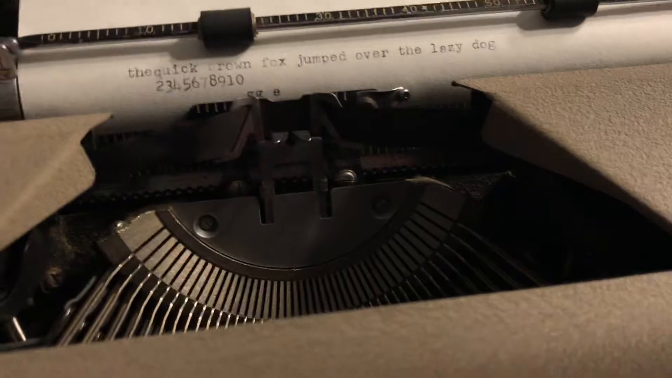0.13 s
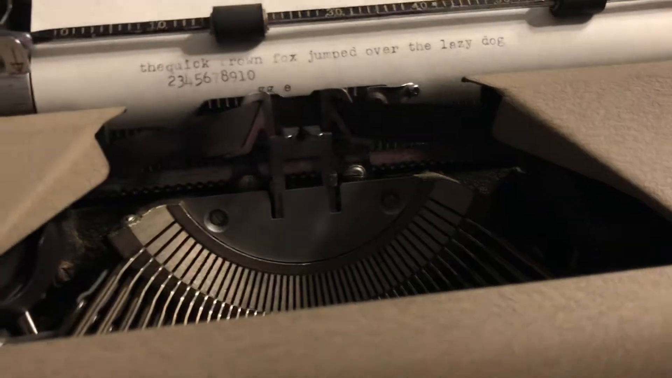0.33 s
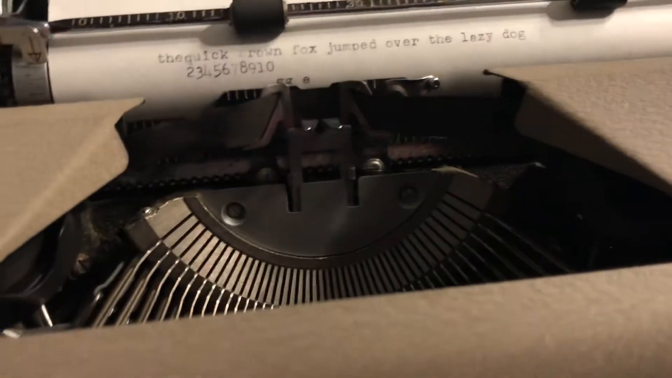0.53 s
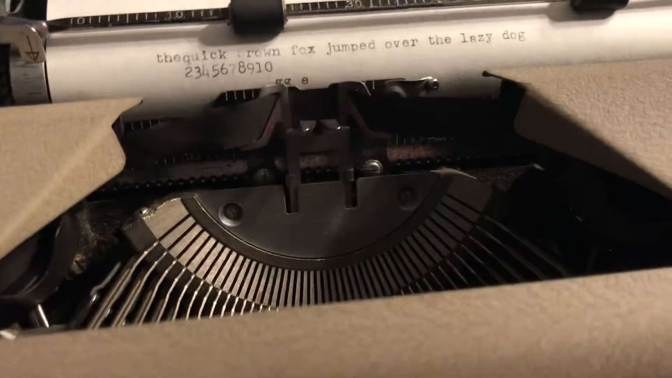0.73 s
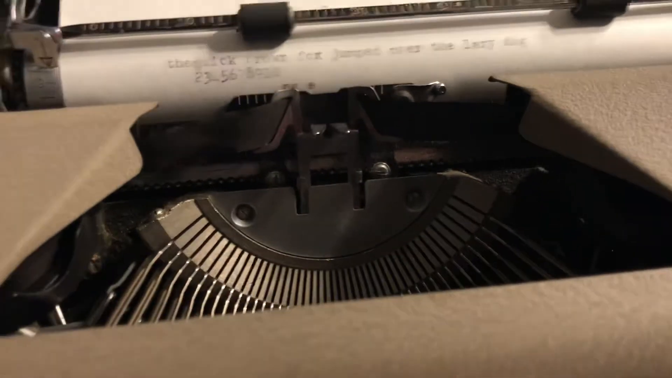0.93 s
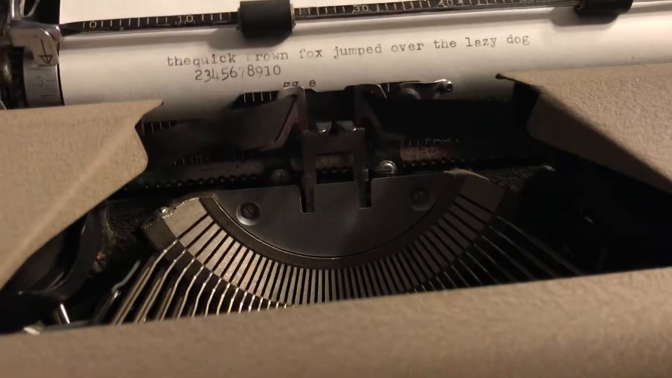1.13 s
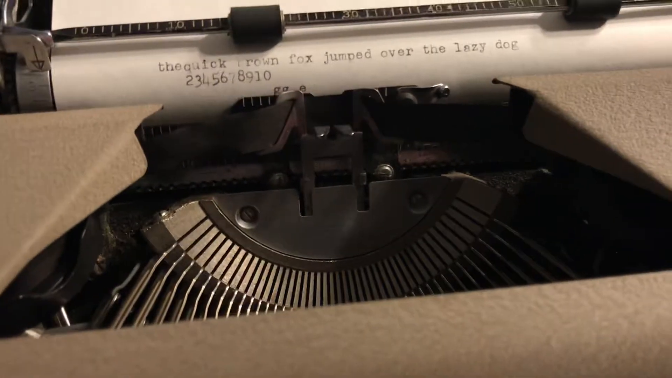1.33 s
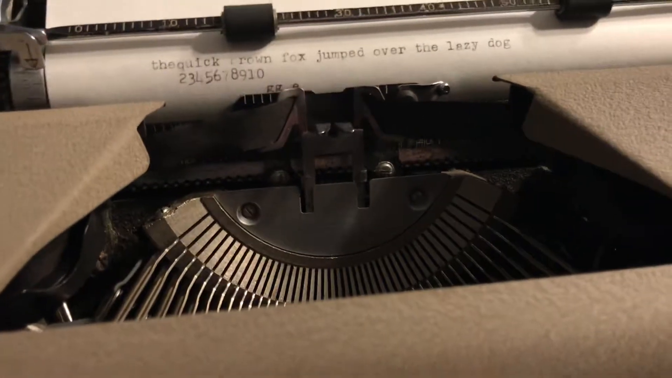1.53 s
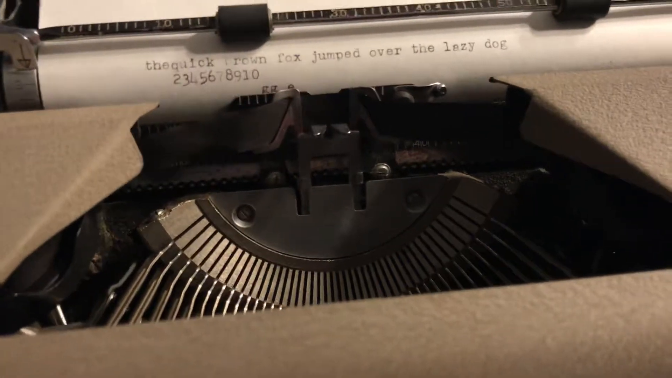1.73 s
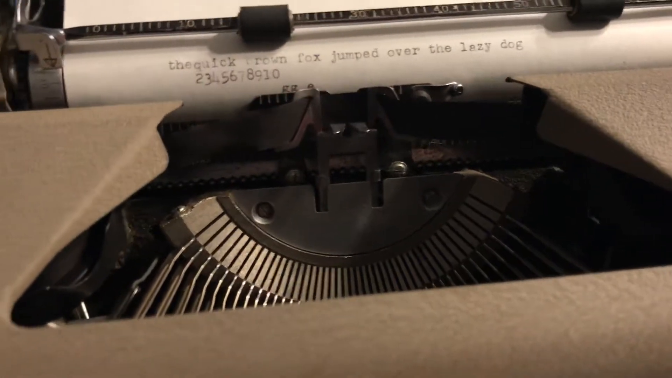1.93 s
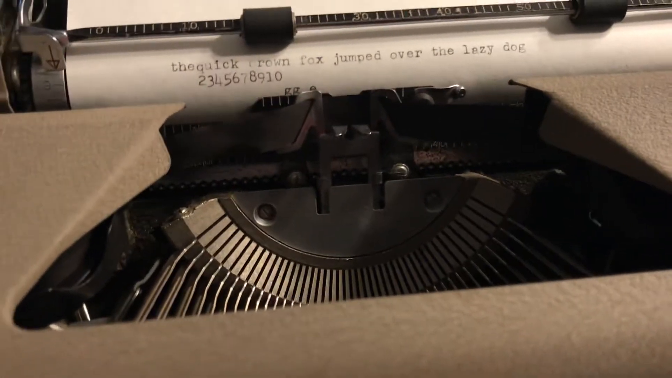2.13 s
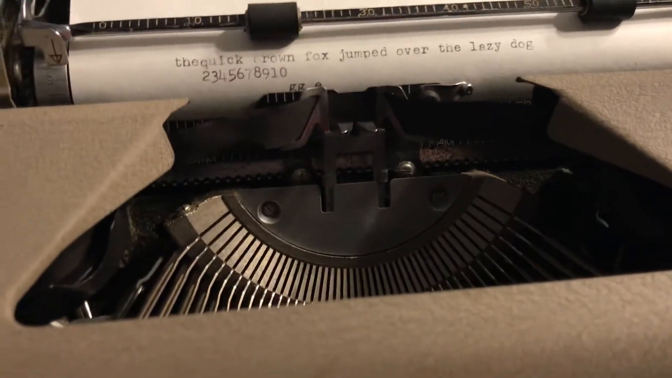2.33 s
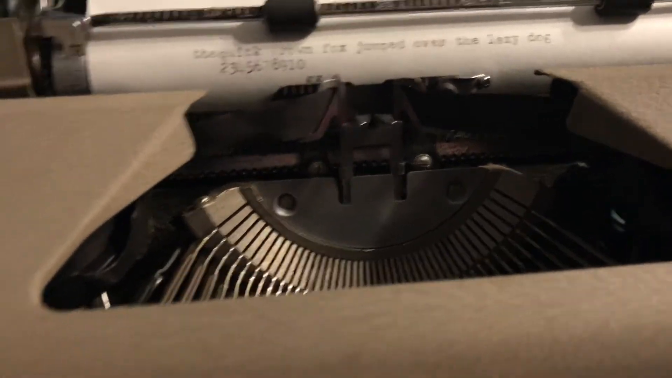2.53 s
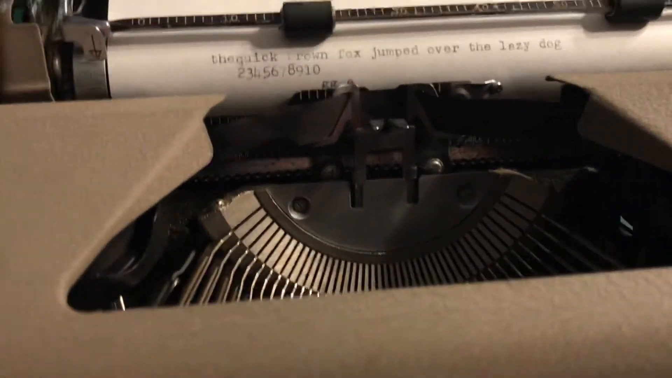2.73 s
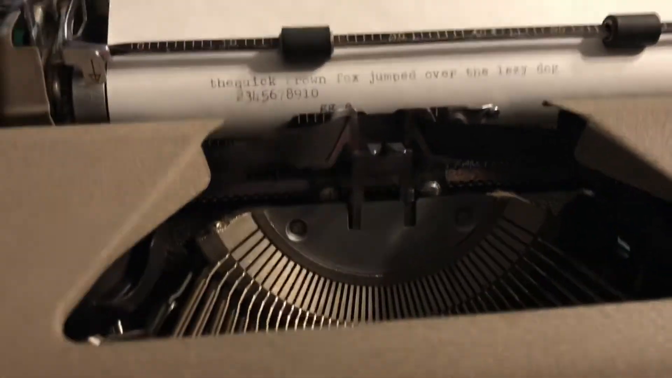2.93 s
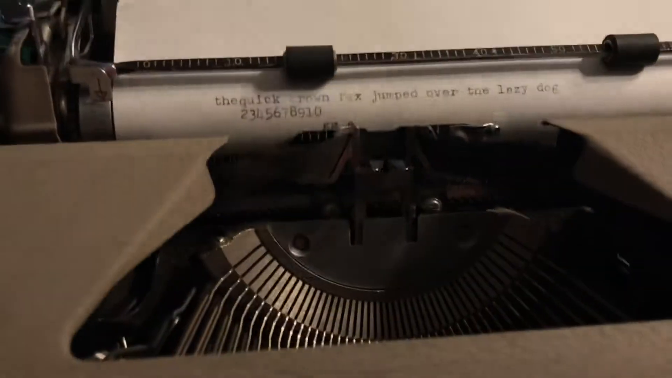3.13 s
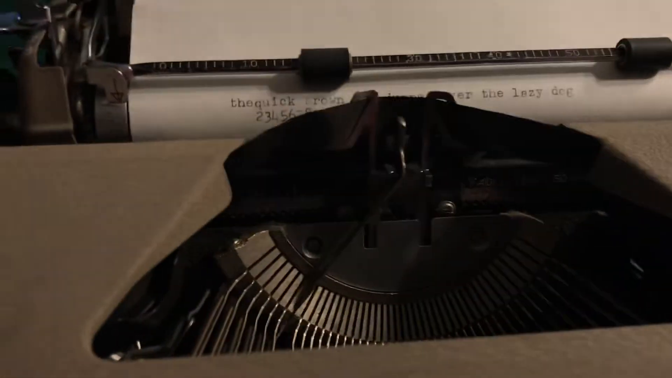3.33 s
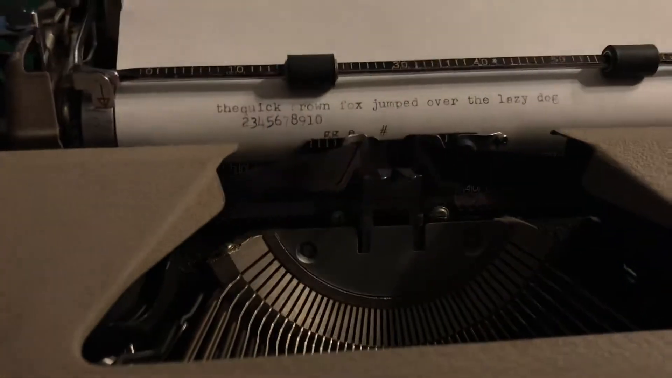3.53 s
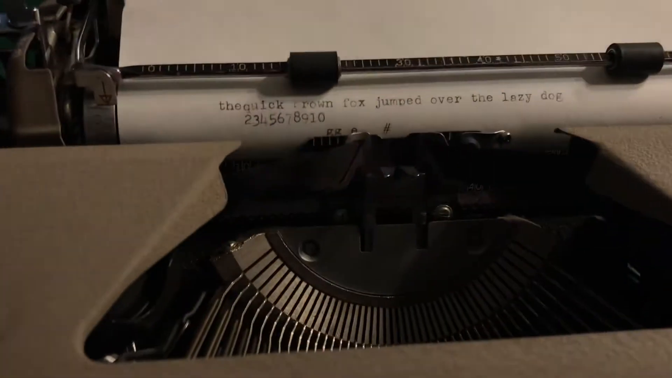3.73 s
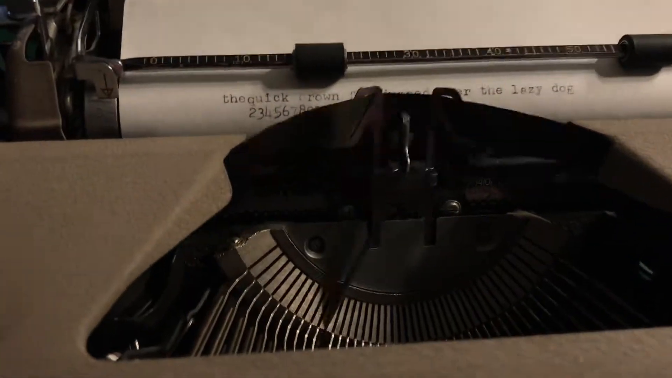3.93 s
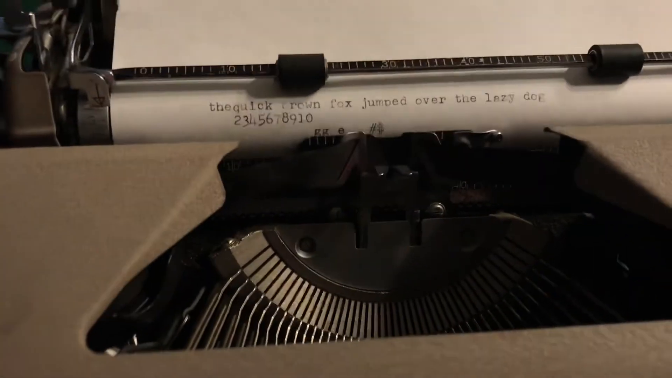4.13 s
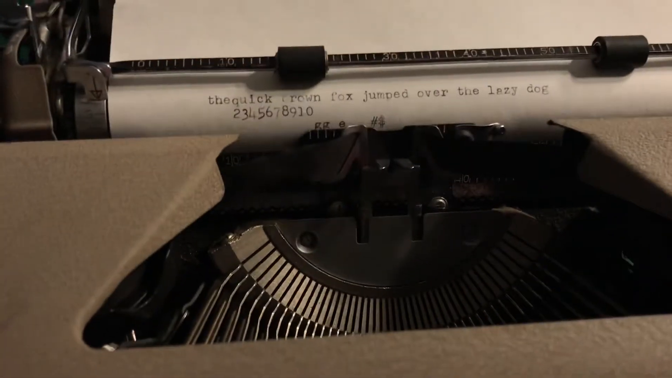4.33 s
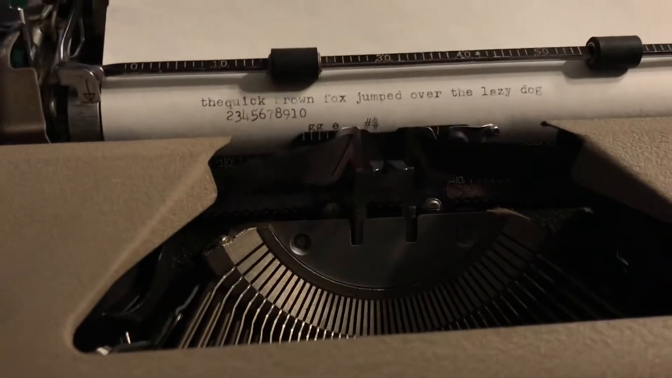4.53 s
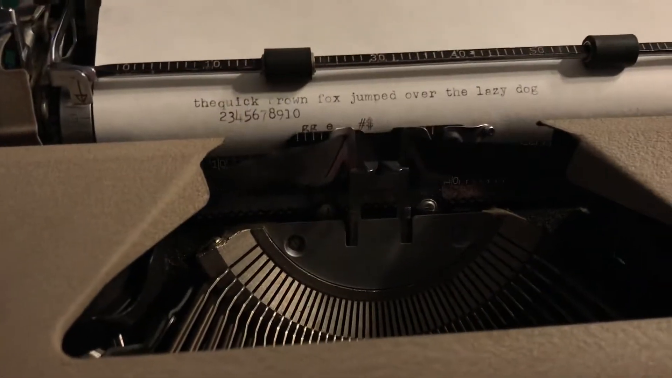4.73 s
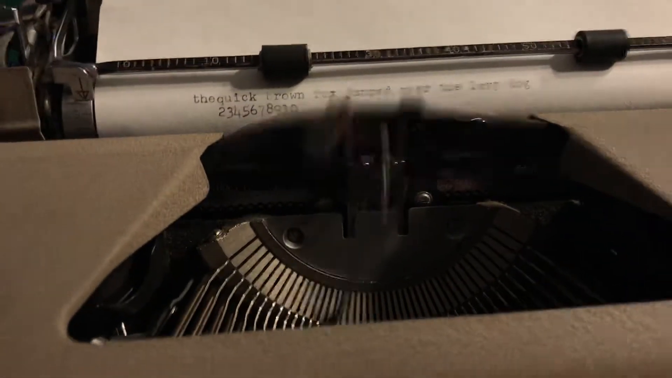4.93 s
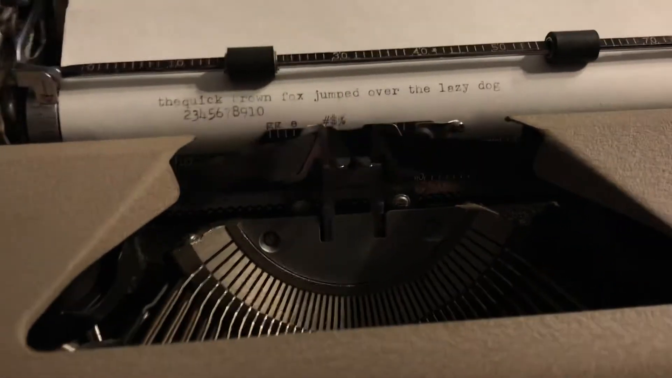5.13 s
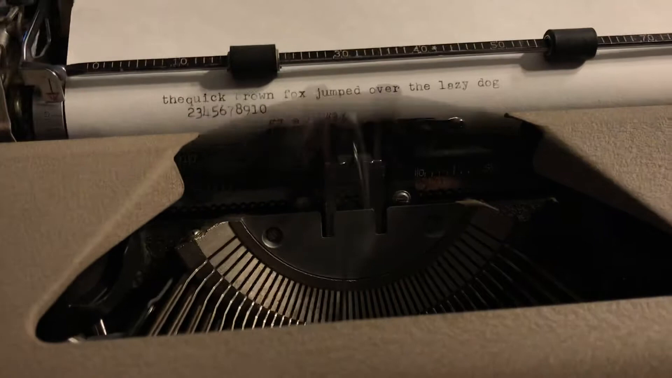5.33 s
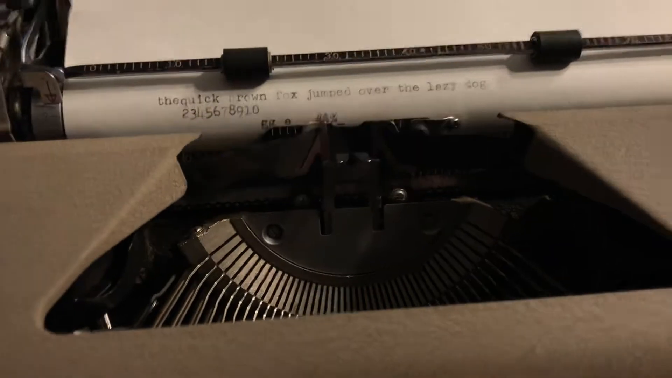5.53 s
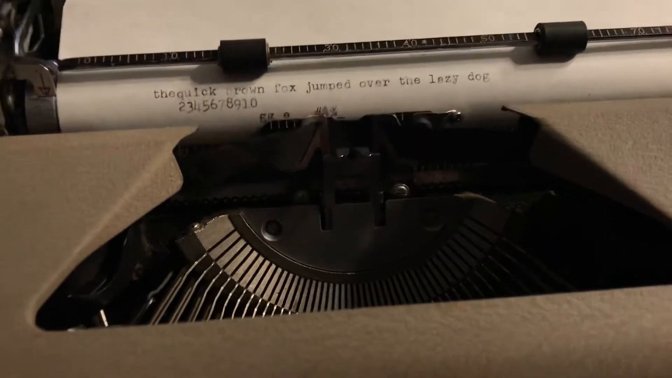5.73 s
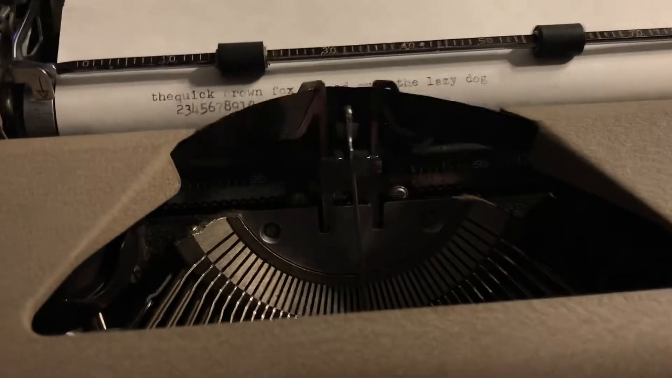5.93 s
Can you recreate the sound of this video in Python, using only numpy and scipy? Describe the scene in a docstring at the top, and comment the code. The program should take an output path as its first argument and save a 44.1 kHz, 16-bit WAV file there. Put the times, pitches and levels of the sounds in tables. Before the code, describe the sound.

A manual typewriter's space bar is tapped three times, then five keys clack slowly, one at a time, over a low hum.

```python
"""A manual typewriter on a desk in a quiet room, a small microphone close to it. Mains hum, room rumble
and hiss come first. A finger lands and the space bar is pressed three times. Then five keys are struck:
lever, typebar on the platen, escapement, and the bar falling back. Each is a cluster of steel contacts
that knock the case and thump the desk. The hiss is louder for a moment after each press and landing."""
import sys
import numpy as np
from scipy import signal
from scipy.fft import rfft, irfft, next_fast_len
from scipy.io import wavfile
from scipy.ndimage import uniform_filter1d, map_coordinates

SR = 44100
rng = np.random.default_rng(int(sys.argv[2]) if len(sys.argv) > 2 else 0)


def waveform_to_disk(signal):
    """Save audio, clipped to [-1, 1], as 16-bit WAV at the path in sys.argv[1]."""
    frames = np.transpose(np.atleast_2d(signal))
    scaled = np.clip(frames, -1, 1) * 32767
    samples = np.round(scaled).astype(np.int16)
    wavfile.write(sys.argv[1], SR, samples)


N = 268216

# Contact levels and decays are nominal: linkage() scales them for steel, case and desk.
# space bar going down: click_s, click_db, bottoming_db
SPACE_PRESSES = [(.829, -28, -26), (1.0944, -25.5, -30), (1.3609, -24.5, -30)]
# space bar let go: catch_s, catch_db, catch_rise_ms, stop_s, stop_db, stop_rise_ms, stop_jolt_db,
# land_s, land_db, land_rise_ms, land_jolt_db
SPACE_RELEASES = [(.968, -32, 8.3, .9782, -25.5, 13, -32, 1.0036, -28, 13, -25.5),
                  (1.228, -32, 7, 1.2353, -23, 2.8, -30, 1.2658, -28, 21, -30),
                  (1.5105, -33, 5, 1.5215, -28, 16, -40, 1.5485, -31, 25, -27.5)]
# keys going down: lever_s, lever_db, lever_decay_s, platen_s, clatter_db, bright_db, clatter_decay_s,
# snap_db, ring_db, upper_modes_db, shove_db, escape_s, escape_db, jolt_db, jolt_hz
KEY_STRIKES = [(3.2377, -35, .15, 3.285, -15, 5, .06, -4, -41, -11, -30, 3.3226, -34.5, -28, 108),
               (3.8622, -39, .055, 3.9211, -13.5, 2.5, .04, -5.5, -47, -5, -38, 3.9654, -35, -27.5, 110),
               (4.8013, -37, .075, 4.8525, -10, -1.2, .04, -2.5, -35, -1.2, -38, 4.893, -37.5, -26.5, 109),
               (5.3433, -37, .075, 5.3922, -14, -.4, .055, -4, -37, -9.5, -28, 5.4377, -33.5, -33, 153),
               (5.871, -43, .11, 5.9269, -11, 1.2, .028, -2.2, -42, -8, -28, 5.9761, -30.5, -36, 135)]
# keys let go: the columns of SPACE_RELEASES, then the typebar's ring_db
KEY_RELEASES = [(3.469, -33, 2.3, 3.487, -30, 28, -45, 3.5181, -28, 24, -28.5, -52),
                (4.1157, -34, 2.2, 4.1275, -28, 17, -28, 4.164, -31, 4, -45, -58),
                (5.027, -36, 12, 5.0376, -34.5, 7, -45, 5.0715, -26.5, 30, -30.5, -58),
                (5.574, -34, 18, 5.585, -33, 16, -45, 5.603, -24, 5, -33, -46)]


def amp(db):
    """Decibels to amplitude."""
    return 10 ** (np.asarray(db) / 20)


def unit(x):
    """Scale to rms 1."""
    return x / np.sqrt(np.mean(x ** 2) + 1e-20)


def along(points, hz):
    """Read a curve of (freq_hz, value) points on a log frequency axis."""
    freqs, values = np.transpose(points)
    return np.interp(np.log(hz + 1), np.log(freqs + 1), values)


def filtered(x, response):
    """Pass x through a complex frequency response."""
    size = next_fast_len(N + SR)
    return irfft(rfft(x, size) * response(np.fft.rfftfreq(size, 1 / SR)), size)[..., :N]


def noise(response):
    """Coloured noise of rms 1."""
    return unit(filtered(rng.standard_normal(N), response))


def modes(table):
    """The frequency response of a set of resonances, alternating in sign."""
    return lambda hz: sum((-1) ** k * amp(db) * 1j * hz * width / (pitch ** 2 - hz ** 2 + 1j * hz * width)
                          for k, (pitch, width, db) in enumerate(table))


def wobble(rate_hz):
    """A smooth random curve with rate_hz knots a second."""
    knots = rng.standard_normal(int(N * rate_hz / SR) + 4)
    return map_coordinates(knots, [np.arange(N) * rate_hz / SR])


def ring(table, t, scatter_db):
    """Dying sines, their strengths scattered anew for each blow."""
    return sum(amp(db + scatter_db * rng.standard_normal() - 60 * t / t60) * np.sin(2 * np.pi * hz * t)
               for hz, db, t60 in table)


def room_tone():
    """A wavering mains hum over fuzzy drones and low rumble."""
    hum_levels = [(0, -48.5), (.25, -46.5), (.91, -46.5), (1.2, -48.5), (1.62, -46), (1.95, -48),
                  (2.74, -46), (3.2, -49), (3.5, -53), (3.74, -47.5), (4.1, -48.5), (4.68, -45.5),
                  (4.86, -50), (5.08, -53.5), (5.27, -49.5), (5.44, -47.5), (5.71, -51), (6.08, -49)]  # the hum's slow drift: time_s, level_db
    drone_bands = [(76, 10, -61.5), (196.6, 12, -65), (241.8, 4.8, -71.5), (288.8, 11, -67.5),
                   (343.8, 8, -71.5)]  # narrow bands of noise: pitch_hz, width_hz, level_db
    rumble_spectrum = [(13, -64.5), (22, -34.5), (90, -16.5), (101, -12.5), (122, -3.5), (136, -2),
                       (146, -25.5), (200, -17.5), (372, -28), (1500, -42), (1950, -77), (3300, -120)]  # colour of the rumble: freq_hz, density_db
    t, hum_hz = np.arange(N) / SR, 120
    hum_rms = amp(np.interp(t, *np.transpose(hum_levels)) + 1.1 * wobble(15))
    hum = np.sqrt(2) * hum_rms * np.sin(2 * np.pi * hum_hz * t + 0.17 * wobble(2))
    drones = sum(amp(db) * noise(modes([(hz, width, 0)])) for hz, width, db in drone_bands)
    rumble = noise(lambda hz: amp(along(rumble_spectrum, hz)) * (abs(hz - hum_hz) > 14))
    return hum + drones + amp(-59.5 + 1.2 * wobble(2.4)) * rumble


def hiss():
    """A faint hiss that rises just ahead of each press or landing, holds, and drops back."""
    hiss_spectrum = [(410, -30.5), (700, -3.5), (757, -2), (818, -6.5), (969, -3), (1050, -4.5), (1320, -7),
                     (3040, -9.5), (7640, -15.5), (9280, -14.5), (10400, -21), (13900, -16), (15600, -24.5)]  # colour of the hiss: freq_hz, density_db
    lead_s, hold_s, lift_db = .008, .408, 10.2
    presses = [row[0] for row in KEY_STRIKES + SPACE_PRESSES]
    landings = [row[7] for row in KEY_RELEASES + SPACE_RELEASES]
    raised = np.zeros(N)
    for s in presses + landings:
        raised[round((s - lead_s) * SR):round((s + hold_s) * SR)] = 1
    level_db = -71.7 + .8 * wobble(8.8) + lift_db * uniform_filter1d(raised, size=100)
    return amp(level_db) * noise(lambda hz: amp(along(hiss_spectrum, hz)))


def contacts():
    """Every steel contact: start_s, level_db, rise_ms, decay_s, bright_db, knock_db, thump_db."""
    # The last five columns are a contact's shape; bright, knock and thump are relative to its level.
    taps = [(.698, -58, 7, -10, -2), (.7925, -46, 9, 4, 4), (.809, -52.5, 6, -6, 2),
            (1.1735, -53, 7, -14, 6), (1.4327, -51, 6, -19, 3), (1.4731, -57.5, 7, -6, 10),
            (2.099, -69.5, 7, 7, -3), (2.1276, -66, 16, 5, -7), (2.382, -69, 10, 0, 7),
            (2.5507, -59, 3, -6, 4), (2.5684, -55.5, 9, -9, 3), (2.7512, -55.5, 5, -3, 0),
            (2.9215, -62.5, 12, -7, 2), (3.0384, -70, 3, 7, 2.5), (3.3564, -48, 6, -15, -5),
            (3.3825, -47.5, 6, -12, -19), (3.442, -50, 5.5, 0, -2.5), (3.6037, -52, 3, -4, 1.5),
            (3.6727, -56, 2, -5, 8), (3.7102, -56, 1.5, -9, 6), (3.8522, -53.5, 3, 5, -2),
            (4.0187, -46, 12, -1, -8.5), (4.0964, -39.5, 12, -.6, -4.5), (4.2055, -52, 5, -13, -4),
            (4.335, -58, 7.5, 1.2, -6), (4.355, -62, 9, 3, -8), (4.3732, -57, 5.5, 0, -6),
            (4.55, -65.5, 7, 1.5, 5.5), (4.821, -43.5, 7.5, -3, 5.5), (5.005, -48, 10.5, -3, 3),
            (5.51, -51, 6, 0, -16), (5.54, -50, 24, 2.2, 4.5), (5.688, -53, 6, -15, 0),
            (5.899, -41, 17, 1.2, -.6), (6.0648, -45, 12, -1, 6)]  # loose parts, light touches: start_s, level_db, rise_ms, bright_db, knock_db
    finger = (.6438, -43, .12)  # landing on a key: start_s, level_db, decay_s
    touches = [(s, db, rise_ms, .04 + 3.5 * rise_ms / 1000, bright, knock, -6)  # slower ones last longer
               for s, db, rise_ms, bright, knock in taps]
    levers = [(s, db, 2.4, decay_s, 1.8, -5, -18) for s, db, decay_s, *_ in [finger] + KEY_STRIKES]
    return touches + levers + space_bar_contacts() + key_contacts()


def space_bar_contacts():
    """The space bar clicks, bottoms and settles, then springs back."""
    # after the click: lag_s, level_db, rise_ms, decay_s, bright_db, knock_db, thump_db
    settling = [(.025, -36, 2.6, .048, -7, -2.5, -8)]
    # around the landing: lag_s, relative_db, rise_ms, decay_s, bright_db, knock_db, thump_db
    bounces = [(-.013, -4, 10.5, .052, 2.5, 1.5, -15), (.015, -6.5, 7, .065, 4, -2, -6),
               (.035, -9.5, 6, .115, -1.2, -11, -6), (.064, -18.5, 5, .035, 5, 2.2, 3)]
    click, bottoming = (1.8, .07, 3, -10, -14), (9, .062, 1.2, -9, -21)  # contact shapes
    out = []
    for s, click_db, bottoming_db in SPACE_PRESSES:
        out += [(s, click_db, *click), (s + .009, bottoming_db, *bottoming)]
        out += [(s + lag_s, *rest) for lag_s, *rest in settling]
    return out + fall_back(SPACE_RELEASES, bounces, catch=(.055, 4.5, -4, -15),
                           stop=(.085, 1.2, -8.5, -23), landing=(.07, 3.5, -2.2, -14))


def fall_back(releases, bounces, catch, stop, landing):
    """A part let go slips its catch, meets a stop, lands and bounces."""
    out = []
    for row in releases:  # catch, stop and landing each add: decay_s, bright_db, knock_db, thump_db
        land_s, land_db = row[7:9]
        out += [(*row[0:3], *catch), (*row[3:6], *stop), (*row[7:10], *landing)]
        out += [(land_s + lag_s, land_db + db, *shape) for lag_s, db, *shape in bounces]
    return out


def key_contacts():
    """A typebar swings onto the platen, the carriage is shoved, the escapement trips, the bar drops."""
    # around the blow: lag_s, level_db, rise_ms, decay_s, bright_db, knock_db, thump_db
    swing = [(-.014, -30.5, 15, .075, 1.8, 1.2, -13), (-.005, -25, 10.5, .06, 7, -6, -12),
             (.0105, -26, 7, .036, 0, -3, -19)]
    # around the landing: lag_s, relative_db, rise_ms, decay_s, bright_db, knock_db, thump_db
    bounces = [(-.016, -9, 17, .05, -5, 2.2, -5), (.013, -9, 8, .065, -4, -5, -6),
               (.036, -13, 6, .06, -10, -8, -1.5)]
    shove, escapement = (4, .03, -16, 0, -11), (6, .04, 3, 1.2, -12)  # contact shapes
    out = []
    for row in KEY_STRIKES:
        platen_s, clatter_db, bright_db, decay_s = row[3:7]
        shove_db, escape_s, escape_db = row[10:13]
        out += [(platen_s, clatter_db, 1.6, decay_s, bright_db, -10.5, -25)]
        out += [(platen_s + .023, shove_db, *shove), (escape_s, escape_db, *escapement)]
        out += [(platen_s + lag_s, *rest) for lag_s, *rest in swing]
    return out + fall_back(KEY_RELEASES, bounces, catch=(.05, 5, -5.5, -17),
                           stop=(.08, -1.2, -6.5, -16), landing=(.066, .4, -3.5, -15))


def envelope(part, stretch):
    """The contacts add in power; each swells, then falls 60 dB in stretch times its decay_s."""
    power, t = np.zeros(N + SR), np.arange(-SR // 10, SR // 4) / SR
    for s, db, rise_ms, decay_s, bright_db, knock_db, thump_db in contacts():
        part_db = {"clack": 0, "tick": bright_db, "knock": knock_db, "thump": thump_db}[part]
        swell = np.clip(1 + 1000 * t / rise_ms, 0, 1) ** 2
        fade = amp(-60 * np.maximum(t, 0) / (stretch * decay_s))
        power[round(s * SR) - SR // 10:][:len(t)] += (amp(db + part_db) * swell * fade) ** 2
    return np.sqrt(power[:N])


def desk_pushes():
    """One soft push on the desk for each contact."""
    force = np.zeros(N)
    for s, db, *_, thump_db in contacts():
        force[round(s * SR)] = amp(db + thump_db)
    return filtered(force, lambda hz: 1 / (1 + 1j * hz / 500) ** 2)


def linkage():
    """Each contact is a chatter of tiny impacts: it clatters the steel, knocks the case, thumps the desk."""
    steel_spectrum = [(880, -40), (1500, -6.5), (1640, -8), (2290, -4.5), (2860, -1), (3100, -3),
                      (3350, -1.5), (4580, -2.5), (4910, -9), (5260, -3.5), (6720, -4), (7260, -7),
                      (10600, -8.5), (12300, -6), (15600, -12)]  # colour of the clatter: freq_hz, density_db
    case_modes = [(499.6, 113, 1), (748, 170, 0.5), (1043, 214, 2), (1338, 420, -4), (1600, 150, -3),
                  (1974, 200, -6.5)]  # resonances of the case: pitch_hz, width_hz, gain_db
    desk_modes = [(180, 18, -6), (234.9, 13, 2), (287, 24, -7), (338, 37, -5.5), (418, 40, -5.5)]  # resonances of the desk: pitch_hz, width_hz, gain_db
    chatter = unit(amp(1.46 * wobble(700)))  # impacts about a millisecond apart, uneven in size
    low_share = lambda hz: 1 / (1 + (hz / 7000) ** 8)
    clack = noise(lambda hz: amp(along(steel_spectrum, hz)) * np.sqrt(low_share(hz)))
    tick = noise(lambda hz: amp(along(steel_spectrum, hz)) * np.sqrt(1 - low_share(hz)))
    steel = chatter * (envelope("clack", stretch=0.93) * clack + envelope("tick", stretch=0.82) * tick)
    knock = filtered(envelope("knock", stretch=1.37) * rng.standard_normal(N), modes(case_modes))
    thump = filtered(desk_pushes(), modes(desk_modes))
    hollow = envelope("thump", stretch=6.4) * noise(modes(desk_modes))  # the hollow desk mutters on
    return steel + amp(-6) * hollow + amp(14) * knock + amp(56.5) * thump


def pings():
    """Frame, springs, levers and cover each ring on one note, fluttering as loose parts touch them."""
    thin_notes = [(1.096, 7380, -52, .25), (1.362, 6680, -56, .21), (2.11, 8500, -68, .3),
                  (2.125, 6720, -70, .28), (4.165, 13850, -44, .07), (4.335, 8550, -58, .2),
                  (4.337, 6720, -59, .2), (4.335, 2520, -57, .12)]  # small parts ringing high: start_s, pitch_hz, level_db, t60_s
    spring_rings = [(1.24, -44), (1.365, -48), (1.55, -47)]  # one long-ringing spring: start_s, level_db
    cover_rings = [(2.562, -40, .06), (3.29, -28.5, .21), (3.925, -32, .16), (4.17, -41, .13),
                   (4.806, -33, .28), (4.856, -37, .19), (5.395, -35.5, .21), (5.975, -25, .065)]  # cover, damped by hand or carriage: start_s, level_db, t60_s
    frame_hz, spring_hz, cover_hz = 232.5, 1036, 726
    space_bar_hits = [row[0] for row in SPACE_PRESSES] + [row[7] for row in SPACE_RELEASES]
    frame = [(s + .014, frame_hz, -38.5, .32) for s in space_bar_hits]
    spring = [(s, spring_hz, db, .85) for s, db in spring_rings]
    cover = [(s, cover_hz, db, t60) for s, db, t60 in cover_rings]
    out, t = np.zeros(N + SR), np.arange(SR) / SR
    for s, hz, db, t60 in thin_notes + cover + spring + frame:
        onset = 1 - np.exp(-t * hz / 3)  # a few cycles
        out[round(s * SR):][:len(t)] += onset * ring([(hz, db, t60)], t, scatter_db=1)
    return amp(2.5 * wobble(35)) * out[:N]


def jolts():
    """Blows, stops and landings jolt the whole machine: start_s, peak_db, pitch_hz."""
    stop_hz, landing_hz = 135, 114
    out = []
    for _, _, _, platen_s, *_, escape_s, escape_db, jolt_db, jolt_hz in KEY_STRIKES:
        out += [(platen_s - .0015, jolt_db, jolt_hz), (escape_s, escape_db - 6, stop_hz)]
    for _, _, _, stop_s, _, _, stop_db, land_s, _, _, land_db, _ in KEY_RELEASES:
        out += [(stop_s + .011, stop_db, landing_hz), (land_s + .003, land_db, landing_hz)]
    for _, _, _, stop_s, _, _, stop_db, land_s, _, _, land_db in SPACE_RELEASES:
        out += [(stop_s, stop_db, stop_hz), (land_s + .011, land_db, landing_hz)]
    return out + [(s + .016, -37, landing_hz) for s, *_ in SPACE_PRESSES]


def thuds():
    """At each jolt the machine rocks a cycle or two on its rubber feet, which also give a slower sag."""
    out, t = np.zeros(N + SR), np.arange(SR // 5) / SR
    onset = 1 - np.exp(-t / 0.0088)
    for s, peak_db, hz in jolts():
        thud = onset * ring([(hz, 0, .06), (0.65 * hz, -13, .07)], t, scatter_db=4.5)
        out[round(s * SR):][:len(t)] -= amp(peak_db) * thud / abs(thud).max()
    return out[:N]


def typebars():
    """The slug snaps on the hard platen; the bar rings on, its upper modes at a level set for each key."""
    snap_modes = [(2940, -3.5, .007), (3350, -3.5, 0.004), (6280, -6.5, .007), (7960, -3.5, .007),
                  (11810, -12, 0.0072), (13200, -11.5, .006)]  # slug on the platen: pitch_hz, relative_db, t60_s
    bar_modes = [(4440, 4.5, .23), (6740, -1.5, .19), (11400, -16.5, .3), (12890, -11, .15)]  # the steel bar: pitch_hz, relative_db, t60_s
    rebound_s = .0023  # the slug touches the platen a second time
    out, t = np.zeros(N + SR), np.arange(SR // 3) / SR
    for row in KEY_STRIKES:
        platen_s = row[3]
        snap_db, ring_db, upper_db = row[7:10]
        snap = ring(snap_modes, t, scatter_db=0) * (1 - np.exp(-t / 0.00026))
        snap += amp(-8.5) * np.roll(snap, round(rebound_s * SR))
        bar = ring(bar_modes[:1], t, scatter_db=1) + amp(upper_db) * ring(bar_modes[1:], t, scatter_db=.5)
        out[round(platen_s * SR):][:len(t)] += amp(snap_db) * snap / abs(snap).max() + amp(ring_db) * bar
    for *_, land_s, _, _, _, ring_db in KEY_RELEASES:  # dropping on its rest wakes only the lowest mode
        out[round(land_s * SR):][:len(t)] += amp(ring_db) * ring(bar_modes[:1], t, scatter_db=1)
    return out[:N]


def room_echoes(x):
    """A short, diffuse room echo whose treble dies first; its noise tail is redrawn for each block."""
    decay_times = [(150, 1), (600, 0.71), (2000, 0.44), (6000, 0.33), (15000, .18)]  # the room's reverberation: freq_hz, t60_s
    block, predelay = SR // 8, 300  # samples
    out = np.zeros(N + SR)
    for start in range(0, N, block):
        hz, t, spectrum = signal.stft(rng.standard_normal(SR // 2), SR, nperseg=256)
        fade = amp(-60 * t / along(decay_times, hz)[:, None])
        tail = signal.istft(spectrum * fade, SR, nperseg=256)[1]
        wet = signal.fftconvolve(x[start:start + block], tail / np.linalg.norm(tail))
        out[start + predelay:][:len(wet)] += wet
    return out[:N]


def scene():
    """The typewriter up close, in mono, with the room faint behind it."""
    machine = linkage() + typebars() + pings() + thuds()
    return (machine + amp(-17) * room_echoes(machine) + room_tone() + hiss())[None]


def record(dry):
    """The loudest snaps round off near full scale; the microphone falls away below and above its band."""
    ceiling, bass_hz, treble_hz, cutoff_hz = .95, 22, 15700, 16850
    rounded = dry / (1 + abs(dry / ceiling) ** 6) ** (1 / 6)
    bass = lambda hz: (1j * hz / (bass_hz + 1j * hz)) ** 2
    excess_hz = lambda hz: np.maximum(hz - treble_hz, 0)
    treble = lambda hz: amp(-20 * (1 - np.exp(-excess_hz(hz) / 100)) - .015 * excess_hz(hz))
    return filtered(rounded, lambda hz: bass(hz) * treble(hz) * (hz < cutoff_hz))


dry = scene()
out = record(dry)
waveform_to_disk(out)
```